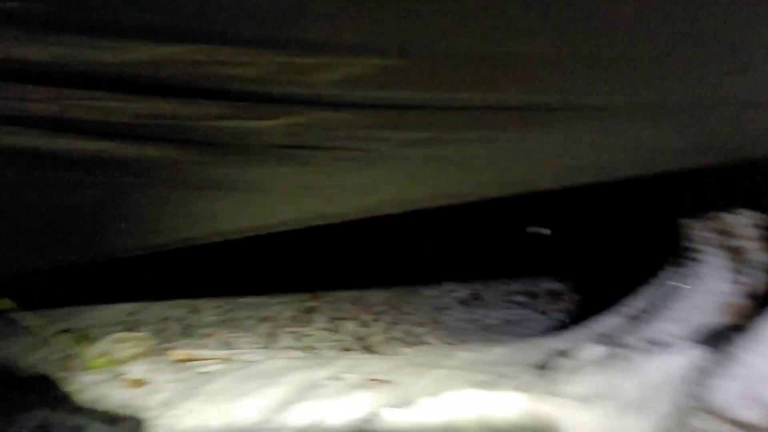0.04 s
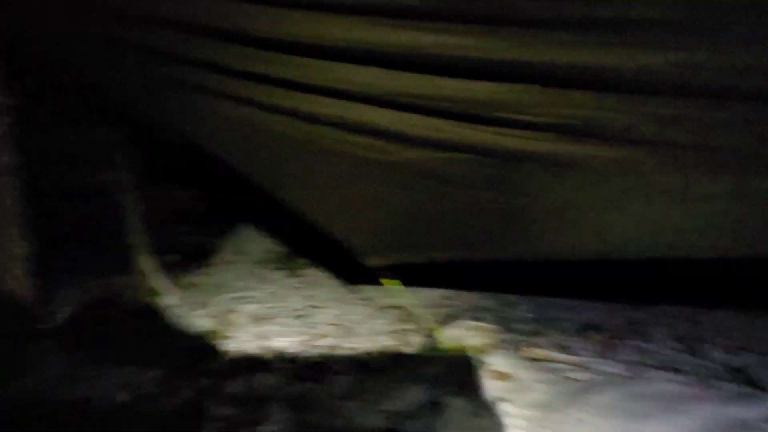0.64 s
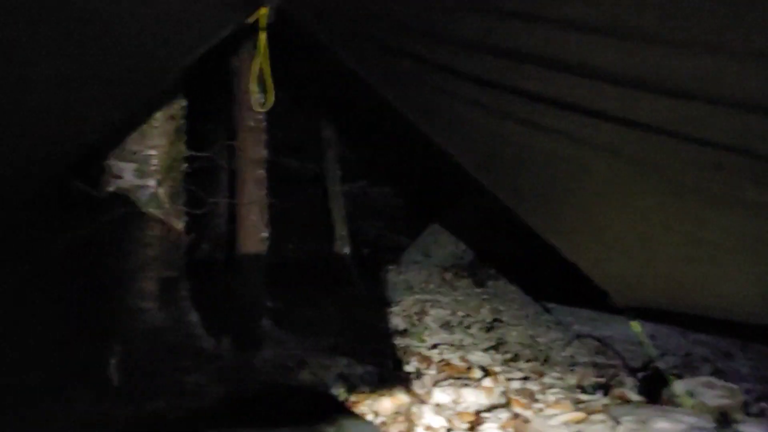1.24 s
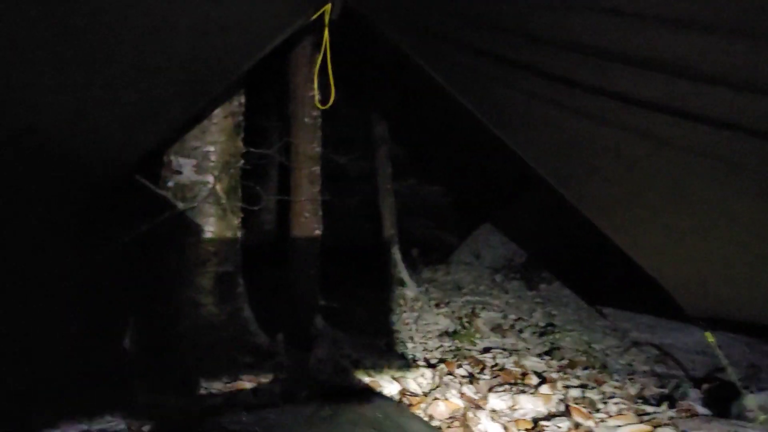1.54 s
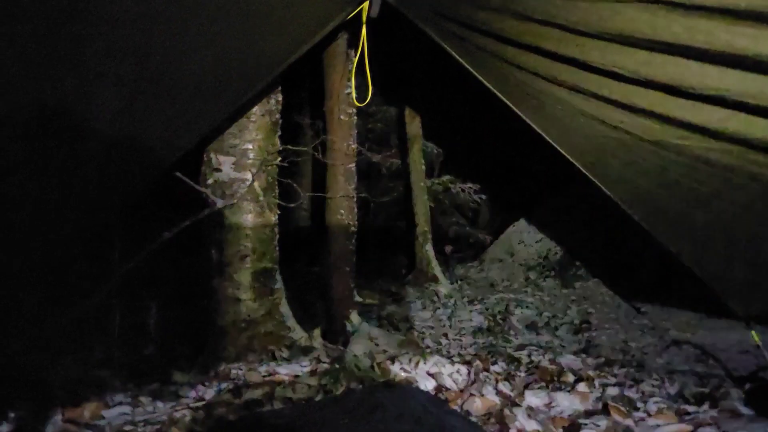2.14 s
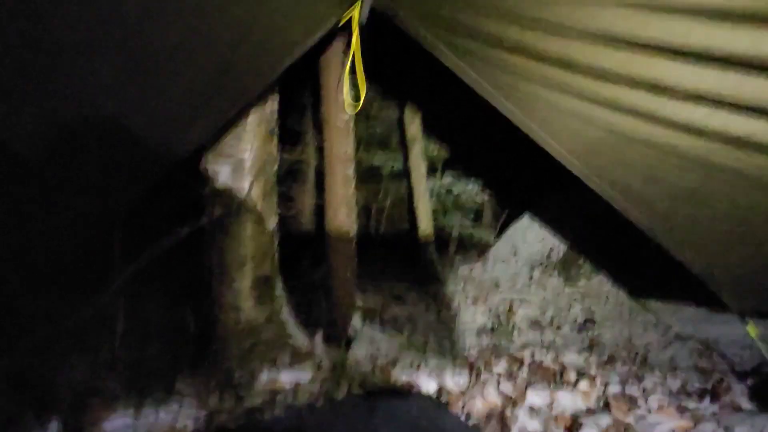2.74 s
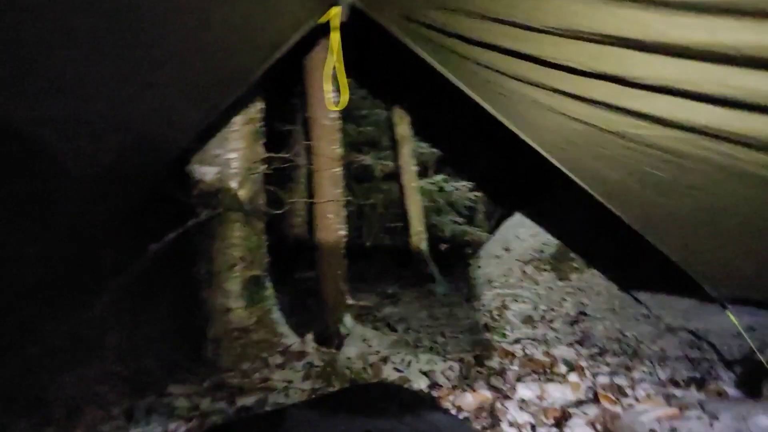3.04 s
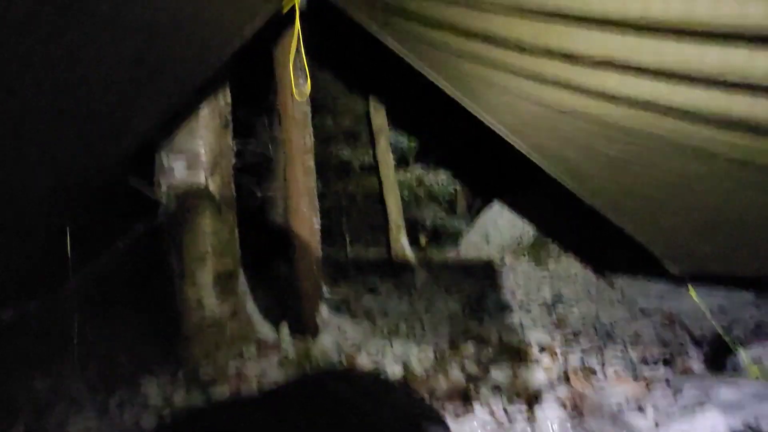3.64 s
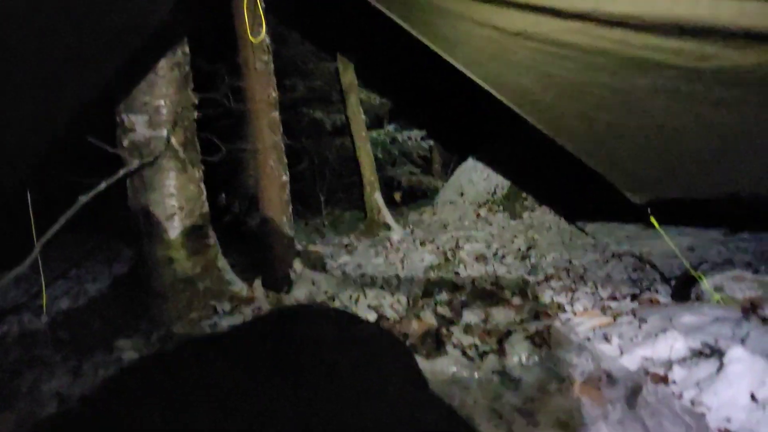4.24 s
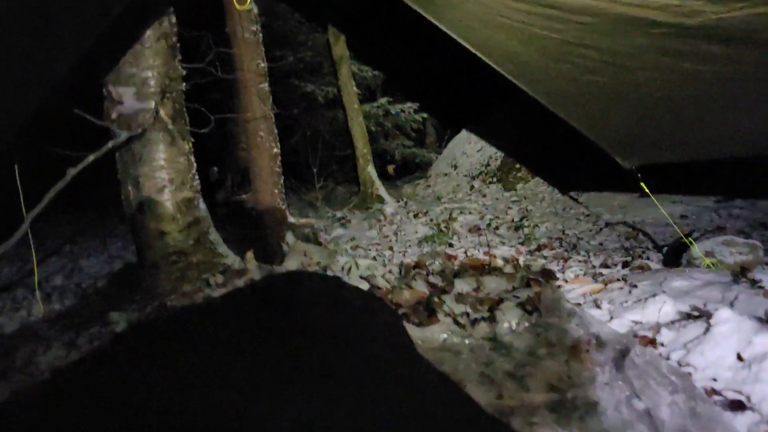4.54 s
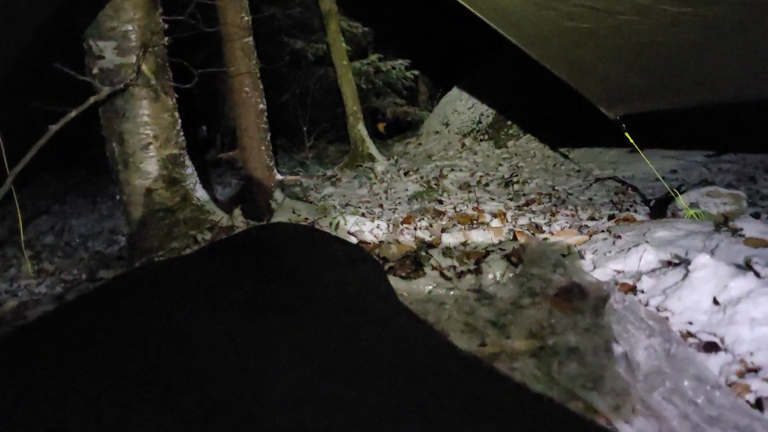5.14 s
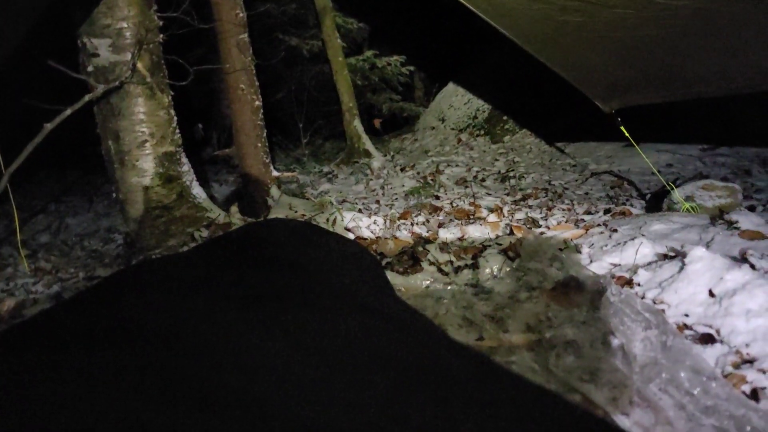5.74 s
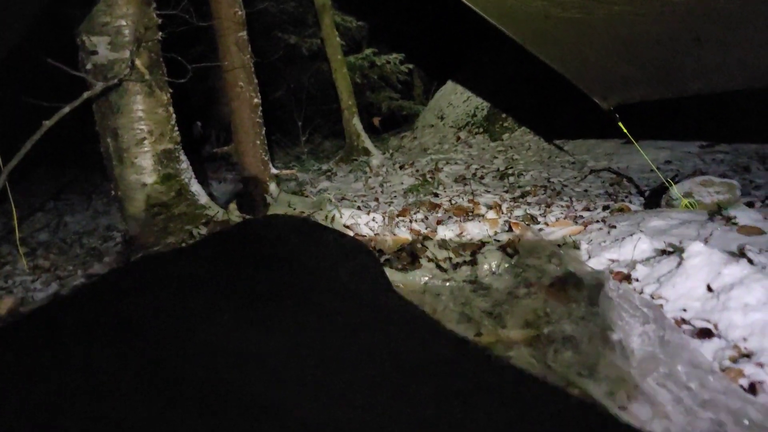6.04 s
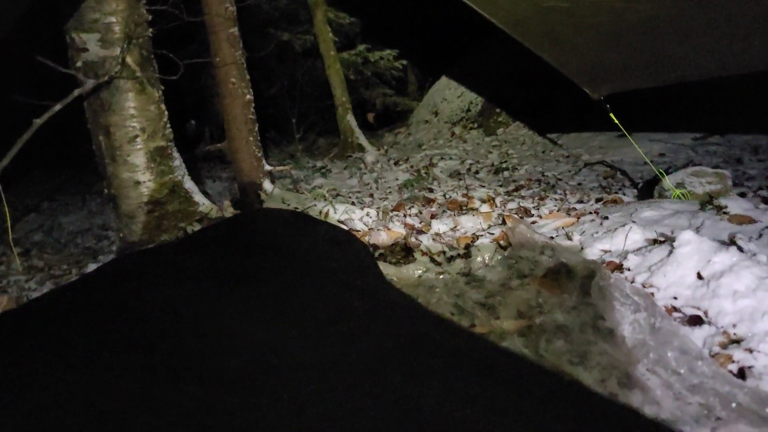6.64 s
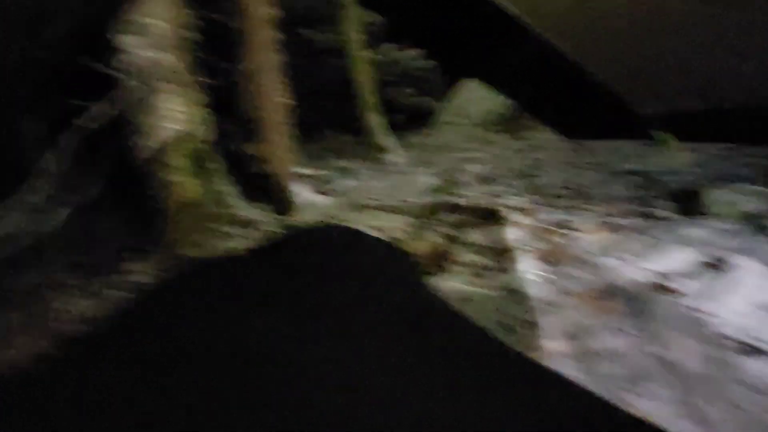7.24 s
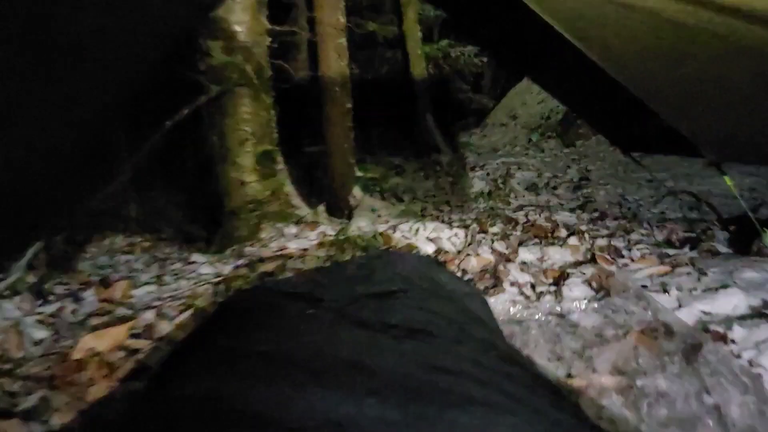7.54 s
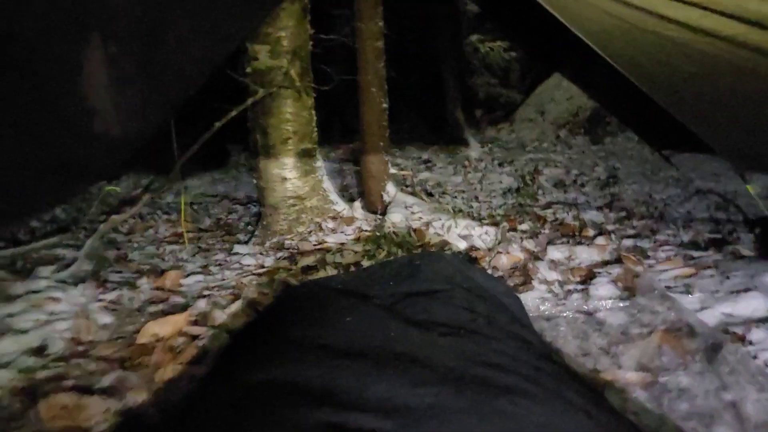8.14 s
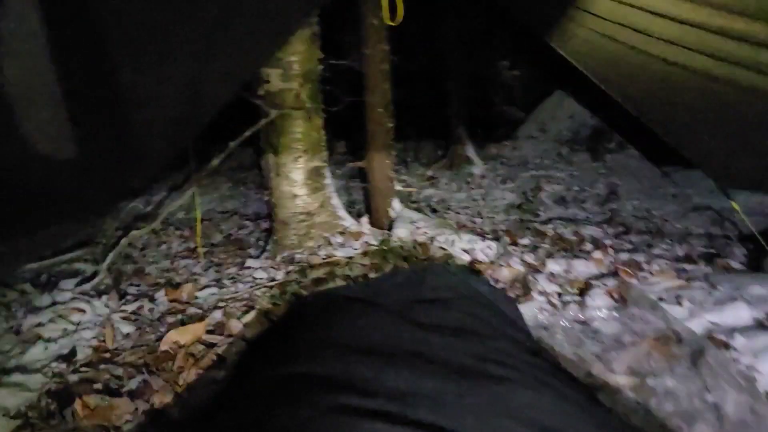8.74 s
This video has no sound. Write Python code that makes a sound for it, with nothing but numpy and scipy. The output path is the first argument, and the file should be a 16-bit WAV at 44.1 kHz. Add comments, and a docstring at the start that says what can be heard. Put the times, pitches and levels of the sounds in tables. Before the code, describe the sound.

A wide, dull roar of wind and a steady low rumble fill the woods around a tarp shelter. Closer air sighs through fir needles and howls in short pushes, then swells into a strong, fluttering gust that faintly sizzles in twigs and puffs against the microphone. As the gust falls away, thick limbs drone low toward the left.

```python
"""Under a tarp in a snowy wood at night, listening to the wind.
Far treetops roar all around over the low rumble of big eddies (swirls of air). Nearer air rushes straight
ahead, sighs in the fir needles, sizzles in the twigs and puffs at the microphone. Branches and lines
moan briefly as eddies pass, and thick limbs add a deep moan that grows on the left.
In the gust the near air howls, with a pitch that follows its speed."""
import sys
import numpy as np
from scipy import signal
from scipy.fft import next_fast_len
from scipy.io import wavfile
from scipy.ndimage import uniform_filter1d

SR = 44100
rng = np.random.default_rng(int(sys.argv[2]) if len(sys.argv) > 2 else 0)


def store_pcm(level_fs):
    """Save levels as 16-bit WAV."""
    pcm = np.round(np.clip(level_fs, -1, 1) * 32767).astype(np.int16)
    wavfile.write(sys.argv[1], SR, np.atleast_2d(pcm).T)


N = 387506
TIME = np.arange(N) / SR
FRAME, HOP = 1024, 256  # noise is built in short overlapping frames: size and step, in samples
FRAME_TIME = np.arange(N // HOP + 5) * HOP / SR
BIN_HZ = np.fft.rfftfreq(FRAME, 1 / SR)

# The tone colour of each noise, from bass to treble: (frequency [Hz], relative level [dB])
HISS_SPECTRUM = [(1000, 1), (3000, -1.5), (5000, -3), (8000, -6), (11000, -14), (15000, -17)]
RUMBLE_SPECTRUM = [(15, -15.5), (40, -10.5), (80, -10), (130, 0.5), (230, 1), (330, 1), (480, -10.5),
                   (900, -27.5), (3000, -74.5)]
ROAR_SPECTRUM = [(60, -32), (200, -12.5), (330, -4), (520, -2), (750, -4), (1000, -9), (1250, -15.5),
                 (1550, -26.5), (2000, -37.5), (3400, -51), (8000, -90)]
NEEDLE_SPECTRUM = [(700, -13), (1400, 4), (1700, -2.5), (2000, -8.5), (2600, -17.5), (3400, -26),
                   (4000, -29), (5000, -36.5), (8000, -49), (15000, -67.5)]
SIZZLE_SPECTRUM = [(1500, -9.5), (2000, -0.5), (2800, 3.5), (3150, -2), (3380, 3), (3620, -5), (3950, -5.5),
                   (4600, -15.5), (8000, -34), (15000, -57.5)]
PUFF_SPECTRUM = [(15, -6), (50, 1), (110, 0), (170, -6), (300, -24), (1000, -61), (4000, -100)]
RUSH_SPECTRUM = [(150, -29), (450, -18.5), (580, -6), (670, 2.5), (800, 0), (1030, -6), (1220, -12),
                 (1500, -15), (1900, -30.5), (2600, -46), (3200, -51), (3450, -47.5), (3650, -56),
                 (4800, -67.5), (7500, -77.5), (15000, -97)]
# How alike left and right are; 1 sounds narrow, 0 wide: (frequency [Hz], likeness [-1 to 1])
HISS_LIKENESS = [(3000, .45), (5000, 0.71), (8000, 0.83), (12000, 0.68)]
RUMBLE_LIKENESS = [(25, 0.77), (60, 0.92), (140, 0.73), (400, .8)]
ROAR_LIKENESS = [(100, 0.56), (300, .7), (520, 0.7), (1000, 0.62), (2000, 0.32), (4000, 0.62), (8000, 0.93),
                 (12000, .85)]
NEEDLE_LIKENESS = [(1500, 0.38), (2500, 0.6), (5000, 0.94), (12000, .8)]
SIZZLE_LIKENESS = [(2000, .5), (5000, .4)]
PUFF_LIKENESS = [(30, 0.1), (120, -.4)]
RUSH_LIKENESS = [(100, 0.93), (600, 0.93), (1100, 0.93), (2000, 0.88), (5000, 0.89), (12000, .8)]

# How loud the high hiss and the low rumble are: (time [s], level [dB])
HISS_CURVE = [(0, -84.5), (2.2, -86.5), (3.6, -84.5), (4.8, -86.5), (6.15, -88.5), (6.28, -84), (6.75, -83),
              (7.2, -88), (7.75, -82), (8.1, -80), (8.79, -84)]
RUMBLE_CURVE = [(0, -38), (2.3, -37), (4.2, -35), (5.5, -37), (7.05, -32), (7.6, -34), (8.79, -31.5)]
# The wind in the far treetops: (time [s], relative level [dB], left minus right [dB])
TREETOP_WIND = [(0, -34, 3), (2, -37, 2.5), (2.7, -36, 0), (4.2, -36.5, -0.5), (4.9, -38, 0),
                (7.1, -36.5, 1), (7.5, -34.5, 0), (8.4, -37, 0), (8.79, -43, 6.5)]
# The wind in the near trees: (time [s], relative level [dB])
NEAR_WIND = [(0, -44), (.6, -38), (1.3, -45.5), (1.9, -47.5), (3.45, -36), (4.3, -39), (4.6, -43),
             (5.3, -44.5), (5.5, -33), (6.1, -32.5), (6.35, -27.5), (6.7, -28.5), (7.25, -35.5), (8.4, -44),
             (8.79, -33)]
# Brief surges and lulls of the wind: (middle [s], length [s], lift [dB])
WIND_SURGES = [(4.075, 0.5, 4), (5.556, 0.16, 2.5), (5.873, 0.24, 3.5), (6.713, 0.095, -0.5),
               (7.019, 0.27, 7.5), (7.158, 0.084, 5.5), (7.27, .16, 1), (7.5, 0.28, 4), (7.694, 0.16, 9.5),
               (7.926, 0.26, 8)]
# Moments of the fastest air in the nearest twigs: (middle [s], length [s], level [dB])
TWIG_SIZZLES = [(3.333, 0.26, -73), (6.469, .56, -66.5), (6.707, 0.096, -66.5), (6.974, .12, -71),
                (7.457, 0.17, -73), (7.76, 0.36, -67)]
# Gusts that reach under the tarp: (middle [s], length [s], level [dB])
AIR_PUFFS = [(4.12, 0.14, -44), (4.903, .35, -49), (6.33, 0.36, -48), (6.72, 0.091, -37.5),
             (7.07, 0.17, -36), (7.45, 0.21, -42.5), (7.78, 0.14, -39)]
# Short moans of branches and lines: (middle [s], length [s], pitch [Hz], width [Hz], level [dB])
BRANCH_MOANS = [(0.493, 0.13, 1260, 110.6, -42), (0.626, 0.28, 573, 79.6, -33),
                (0.777, 0.29, 1230, 90, -41), (1.15, 0.34, 567.5, 141, -34.5), (1.16, 0.16, 1240, 90, -44),
                (1.34, 0.17, 1228, 110, -43), (1.63, 0.24, 466.6, 45.5, -34.5),
                (1.654, 0.35, 938, 110, -41.5), (2.449, 0.42, 545, 100, -33.5),
                (2.76, 0.38, 625.5, 94.4, -33.5), (3.602, 0.17, 659, 130, -37.5),
                (4.161, 0.096, 1500, 300, -47.5), (4.2, .5, 975, 130, -40), (7.418, 0.13, 510, 120, -33),
                (7.487, 0.2, 983, 171, -32), (7.55, .13, 640, 49.6, -32.5), (7.679, .08, 660, 50, -34),
                (7.697, 0.18, 1387, 220, -41), (7.798, 0.13, 1406, 200, -40.5),
                (7.897, 0.1, 1398, 376, -35), (8.712, 0.16, 722, 160, -35.5)]
# Drones of thick limbs: (middle [s], length [s], pitch [Hz], climb [Hz/s], width [Hz], level [dB])
LIMB_MOANS = [(3.693, 1.4, 307, -0.5, 85, -45), (4.948, 0.84, 245.2, 1, 60, -38),
              (7.341, 0.36, 258.8, 23, 30, -34), (7.376, 0.14, 316.3, 58, 30, -38),
              (7.962, .34, 283, 101, 55, -34), (8.018, 0.18, 231.4, -3, 25, -31.5),
              (8.317, 0.19, 234.6, 120, 35, -33.5), (8.41, 0.18, 281, 91.5, 22, -31),
              (8.57, .36, 282, -28, 50, -32.5), (8.53, .44, 338, 91, 72.5, -32),
              (8.68, 0.096, 354.3, 0, 50, -31.5)]
# Pushes of wind that howl; fray is the rough share of the tone:
# (peak time [s], rise [s], fall [s], top pitch [Hz], sag [Hz], level [dB], fray [0 to 1])
HOWL_PUSHES = [(2.954, .061, 0.096, 791, 75, -32.5, 0.35), (3.11, 0.08, 0.082, 772, 57, -30, 0.7),
               (3.21, 0.052, 0.077, 804, 38, -29, 0.04), (3.408, 0.024, 0.048, 748, 38, -28.5, 0.03),
               (4.0, 0.079, 0.057, 698, 38, -30, 0.15), (4.11, .06, 0.12, 688.6, 38, -28.5, 0.1),
               (4.345, .07, 0.086, 720, 64, -28.5, 0.7), (5.505, 0.043, 0.05, 807, 25, -24, 0.01),
               (5.556, 0.05, 0.061, 943, 69, -27, 0.6), (5.68, 0.12, 0.087, 797, 24, -26.5, 0),
               (5.825, 0.017, 0.13, 993, 53, -24.5, 0.01), (5.945, .07, 0.07, 952, 22, -26, 0.08),
               (6.04, 0.039, 0.083, 964, 230, -25, 0.33), (6.16, .05, 0.085, 928, 42, -26, 0.3),
               (6.27, 0.059, 0.059, 987, 130, -22.5, 0.36), (6.37, .06, 0.053, 1157, 105, -26.5, 0.32),
               (6.475, .11, .1, 1147, 69.5, -23, 0.27), (6.53, 0.03, .15, 1045, 67, -23.5, .25),
               (6.651, 0.047, 0.05, 983, 35, -25.5, .45), (6.72, 0.047, 0.059, 1109, 130, -20, 0.34),
               (6.79, 0.038, .05, 977, 81, -22, 0.17), (6.855, 0.024, 0.045, 810, 62, -24, 0.3),
               (6.98, 0.08, 0.099, 1019, 120, -27, 0.55), (7.02, .05, 0.061, 788, 24, -28.5, 0.44),
               (7.165, 0.04, 0.038, 796, 50, -24.5, 0.4), (7.32, .1, .05, 804, 15, -32, .2),
               (7.455, .035, .05, 850, 70, -29.5, .6), (7.55, .04, 0.031, 810, 29, -28.5, .35)]


def gain_of(db):
    """Turns decibels into a number to multiply a sound by."""
    return 10 ** (np.asarray(db) / 20)


def unit_level(x):
    """Scales a signal so that its average size (rms) is 1."""
    return x / np.sqrt(np.mean(abs(x) ** 2) + 1e-20)


def over_frequency(points):
    """Joins a table's points into a curve from bass to treble, on a log-frequency axis."""
    hz, value = np.transpose(points)
    return np.interp(np.log(BIN_HZ + 1), np.log(hz + 1), value)


def over_time(rows):
    """Joins a table's points into curves over time, one for each column after the first."""
    times, *columns = np.transpose(rows)
    return [np.interp(TIME, times, column) for column in columns]


def drift(rate_hz):
    """A smooth random wobble around 0 that changes up to about rate_hz."""
    size = next_fast_len(N)
    hz = np.fft.fftfreq(size, 1 / SR)
    noise = rng.standard_normal(size) + 1j * rng.standard_normal(size)
    return unit_level(np.fft.ifft(noise / (1 + (hz / rate_hz) ** 4))[:N]).real


def panned(pair, left_db):
    """Leans a stereo sound to the left, or to the right if left_db is negative."""
    return np.array([pair[0] * gain_of(left_db / 2), pair[1] * gain_of(-left_db / 2)])


def arch(t, middle, length):
    """The swell of a passing eddy: half a cosine, from 0 up to 1 and back."""
    return np.cos(np.pi * np.clip((t - middle) / length, -.5, .5))


def surge_db():
    """The lift that brief surges give to the wind."""
    return sum(lift_db * arch(TIME, middle, length) for middle, length, lift_db in WIND_SURGES)


def turbulence(spectrum, likeness, patchy_db, flicker_db):
    """Stereo noise of swirling air: eddies lift patches of the spectrum and shake the whole of it."""
    a, b, c, d, patches = rng.standard_normal((5, len(FRAME_TIME), len(BIN_HZ)))
    patches = uniform_filter1d(patches, size=18, axis=0)  # smooth over time
    patches = unit_level(uniform_filter1d(patches, size=4, axis=1))  # and over frequency
    flicker = unit_level(uniform_filter1d(rng.standard_normal(len(FRAME_TIME)), size=6))[:, None]
    shared = np.clip(over_frequency(likeness), -1, 1)
    left = a + 1j * b
    right = shared * left + np.sqrt(1 - shared ** 2) * (c + 1j * d)
    shape_db = over_frequency(spectrum) + patchy_db * patches + flicker_db * flicker
    frames = np.array([left, right]) * gain_of(shape_db)
    _, air = signal.istft(frames.swapaxes(1, 2), nperseg=FRAME, noverlap=FRAME - HOP)
    return unit_level(air[:, :N])


def eddy_tone(hz, width_hz, spread, steady):
    """Eddies peel off a branch at a loose beat, making a tone: more width is fuzzier, more spread wider."""
    lowpass = signal.butter(3, np.clip(width_hz / 2, 2, 2000), fs=SR, output="sos")
    a, b = rng.standard_normal((2, 2, 2 * SR))
    swing = unit_level(signal.sosfilt(lowpass, a + 1j * b))[:, -len(hz):]
    swing = swing / np.sqrt(1 + abs(steady * swing) ** 2)  # capping the swing steadies the loudness
    mid, side = (swing * np.exp(2j * np.pi * np.cumsum(hz) / SR)).real
    return unit_level(np.array([mid + spread * side, mid - spread * side]))


def high_hiss():
    """A faint hiss lies above the wind; it jumps up with the gust and swells again behind it."""
    level_db, = over_time(HISS_CURVE)
    air = turbulence(HISS_SPECTRUM, HISS_LIKENESS, patchy_db=1.0, flicker_db=0.9)
    return panned(air * gain_of(level_db), left_db=-0.5)


def low_rumble():
    """The largest eddies make a low rumble."""
    level_db, = over_time(RUMBLE_CURVE)
    air = turbulence(RUMBLE_SPECTRUM, RUMBLE_LIKENESS, patchy_db=1.1, flicker_db=-0.23)
    return panned(air * gain_of(level_db), left_db=3.0)


def treetop_roar(surge_share=0.22):
    """Many far treetops blend into a wide, dull roar that leans left at the start and the end."""
    wind_db, left_db = over_time(TREETOP_WIND)
    air = turbulence(ROAR_SPECTRUM, ROAR_LIKENESS, patchy_db=1.0, flicker_db=0.9)
    return panned(air * gain_of(wind_db + surge_share * surge_db() + 4.5), left_db)


def needle_sigh(base_db=-52.5, base_wind_db=-40, follow_share=0.39, lag_s=0.75):
    """Tiny eddies around fir needles make a soft, wide sigh that follows the wind late and weakly."""
    wind_db, = over_time(NEAR_WIND)
    memory = np.exp(-1 / (lag_s * SR))
    late_wind_db = signal.lfilter([1 - memory], [1, -memory], wind_db + surge_db() - base_wind_db)
    air = turbulence(NEEDLE_SPECTRUM, NEEDLE_LIKENESS, patchy_db=1.0, flicker_db=0.4)
    return panned(air * gain_of(base_db + follow_share * late_wind_db), left_db=-3.5)


def twig_sizzle():
    """Twigs and needles add a bright edge only while the air is at its fastest."""
    strength = sum(gain_of(db) * arch(TIME, middle, length) for middle, length, db in TWIG_SIZZLES)
    return turbulence(SIZZLE_SPECTRUM, SIZZLE_LIKENESS, patchy_db=1.6, flicker_db=2.5) * strength


def microphone_puffs():
    """Air brushes each side of the microphone on its own, making soft, low thuds."""
    strength = sum(gain_of(db) * arch(TIME, middle, length) ** 2 for middle, length, db in AIR_PUFFS)
    return turbulence(PUFF_SPECTRUM, PUFF_LIKENESS, patchy_db=-0.5, flicker_db=1.0) * strength


def branch_moans(pitch_bend=0.0299):
    """A passing eddy makes a branch or line sing; the pitch rises and falls a little with the swell."""
    out = np.zeros((2, N))
    for middle, length, hz, width_hz, level_db in BRANCH_MOANS:
        inside = abs(TIME - middle) < length / 2
        swell = arch(TIME[inside], middle, length)
        tone = eddy_tone(hz * (1 + pitch_bend * (swell - 1)), width_hz, spread=0.3, steady=0.21)
        out[:, inside] += gain_of(level_db) * swell * tone
    return panned(out, left_db=2.0)


def limb_moans():
    """Thick limbs shed eddies more slowly, so they drone low on the left, louder once the gust arrives."""
    out = np.zeros((2, N))
    for middle, length, hz, climb, width_hz, level_db in LIMB_MOANS:
        inside = abs(TIME - middle) < length / 2
        swell = arch(TIME[inside], middle, length)
        tone = eddy_tone(hz + climb * (TIME[inside] - middle), width_hz, spread=.3, steady=2)
        out[:, inside] += gain_of(level_db) * swell * tone
    return panned(out, left_db=5.5)


def near_rush():
    """Air tears through the near trees in surges."""
    wind_db, = over_time(NEAR_WIND)
    air = turbulence(RUSH_SPECTRUM, RUSH_LIKENESS, patchy_db=1.77, flicker_db=1.47)
    return panned(air * gain_of(wind_db + surge_db() + 1.5), left_db=-0.4)


def gust_howl(pitch_power=0.69, quiet_below_push=0.083):
    """Each push of wind lifts the howl's pitch and level; swirling air makes it rough and fluttery."""
    out = np.zeros((2, N))
    waver = 1 + .02 * drift(rate_hz=26)
    for peak, rise, fall, top_hz, sag_hz, level_db, fray in HOWL_PUSHES:
        inside = (TIME > peak - rise) & (TIME < peak + fall)
        push = np.interp(TIME[inside], [peak - rise, peak, peak + fall], [0, 1, 0])
        hz = (top_hz - sag_hz * (1 - push ** pitch_power)) * waver[inside]
        swell = np.sqrt(push) * np.tanh(push / quiet_below_push) ** 2
        clear = eddy_tone(hz, width_hz=55, spread=.07, steady=3)
        rough = eddy_tone(hz, width_hz=230, spread=.1, steady=2.8)
        tone = np.sqrt(1 - fray) * clear + np.sqrt(fray) * rough
        out[:, inside] += gain_of(level_db) * swell * tone
    flutter_hz = 40 * (1 + 0.32 * drift(rate_hz=9.9))
    flutter = 1 + .35 * np.sin(2 * np.pi * np.cumsum(flutter_hz) / SR)
    return out * unit_level(flutter)


def scene():
    """All the voices of the wind together."""
    background = high_hiss() + low_rumble() + treetop_roar()
    details = needle_sigh() + twig_sizzle() + microphone_puffs() + branch_moans() + limb_moans()
    return background + details + near_rush() + gust_howl()


def record(dry):
    """Cuts away the treble above 15000 Hz."""
    lowpass = signal.firwin(511, 15000, window=("kaiser", 9), fs=SR)
    return signal.oaconvolve(dry, lowpass[None], "same")


dry = scene()
out = record(dry)
store_pcm(out)
```